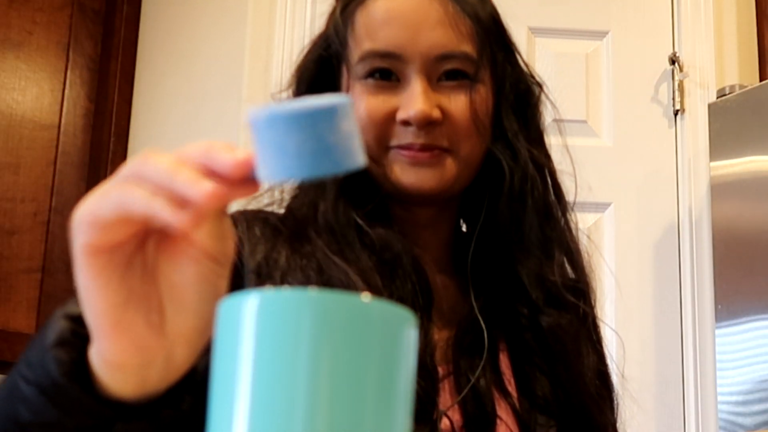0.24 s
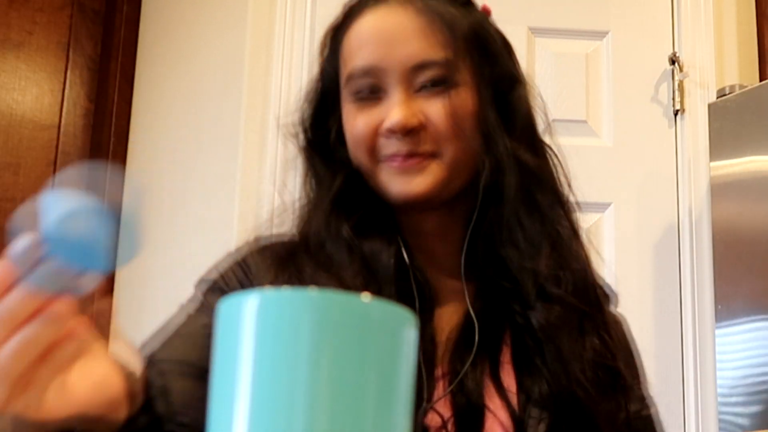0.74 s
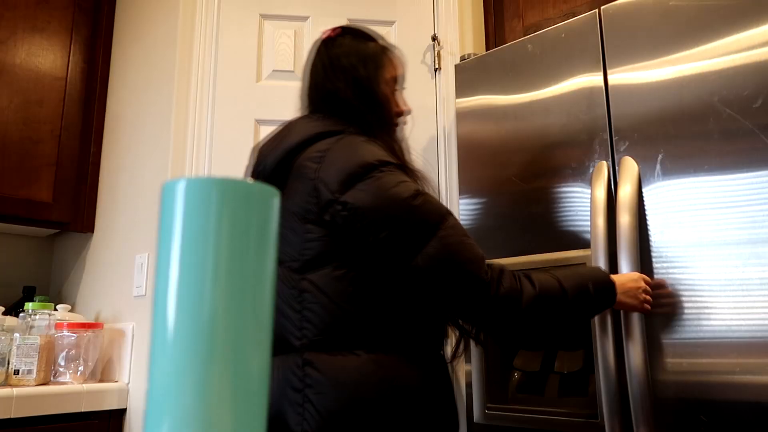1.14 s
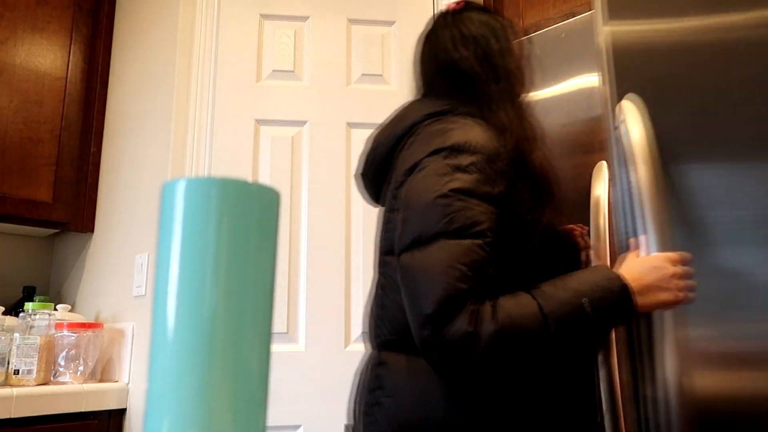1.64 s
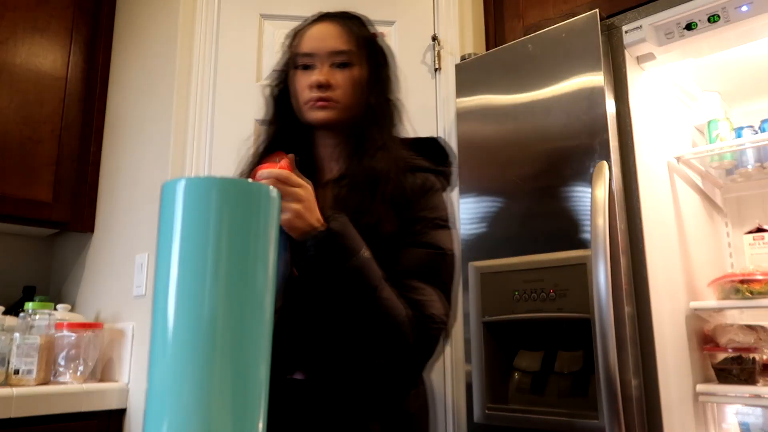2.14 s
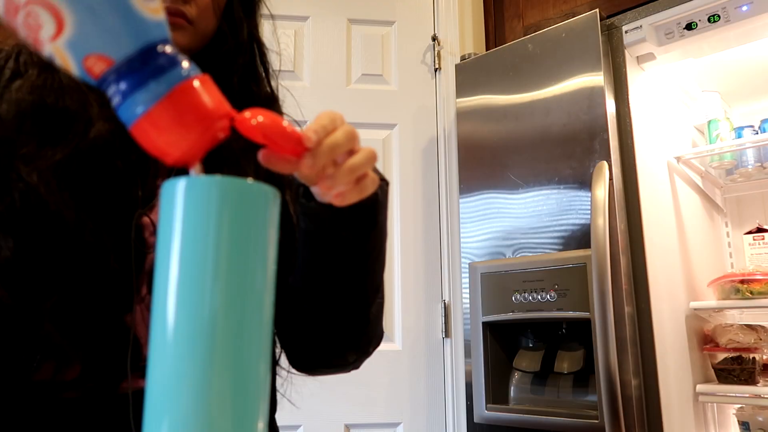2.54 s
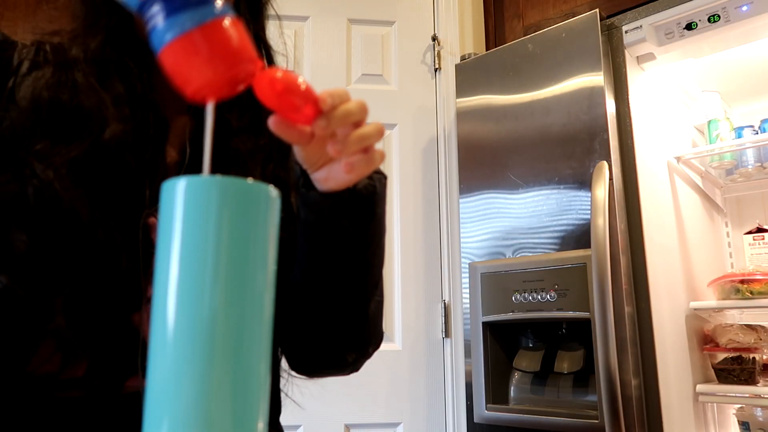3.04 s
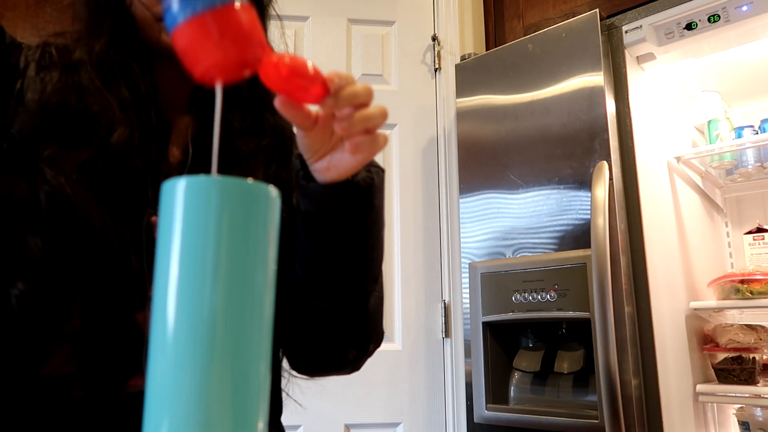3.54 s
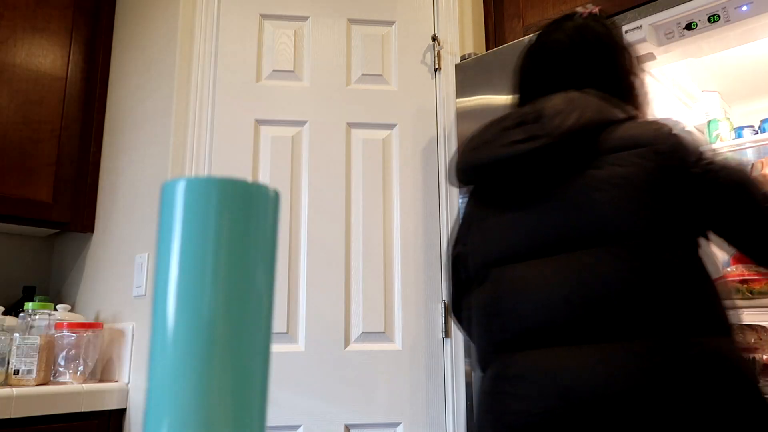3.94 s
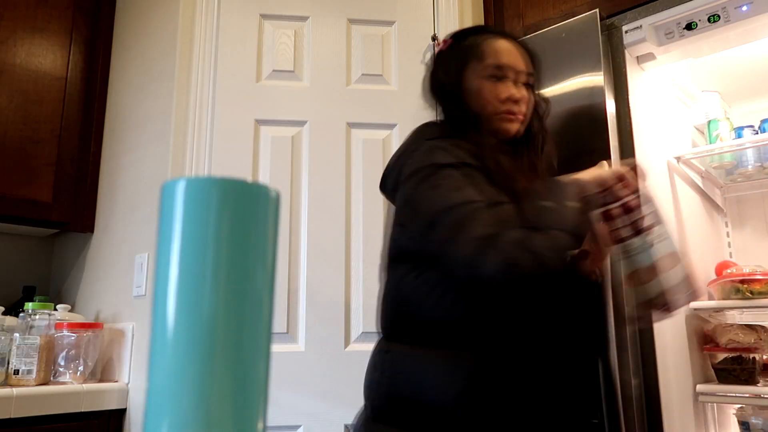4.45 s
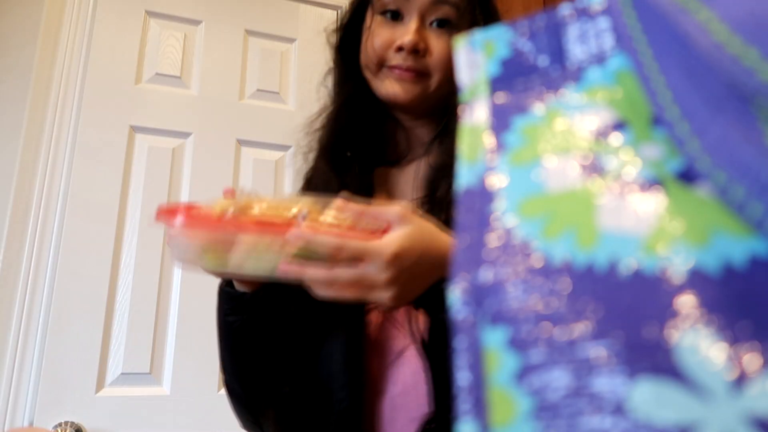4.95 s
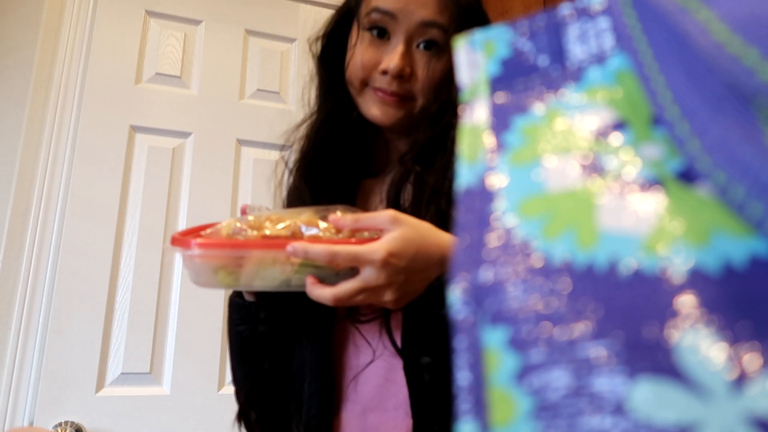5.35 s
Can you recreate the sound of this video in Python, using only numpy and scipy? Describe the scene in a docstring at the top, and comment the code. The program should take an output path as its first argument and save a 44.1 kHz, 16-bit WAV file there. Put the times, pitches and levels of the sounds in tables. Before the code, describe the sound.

Over a low fridge hum and the soft rustle of a padded jacket, a rubber door seal unsticks and the door shudders open with deep thumps. A sharp pop and click follow from a nearby plastic bottle cap. Then comes about a second of rummaging: containers slide and bump, a jar clinks, and a full carton is jolted. The kitchen adds a short echo, and only hum and faint rustling remain at the end.

```python
"""A quiet kitchen, where a refrigerator hums. Its door peels off the rubber seal by stick-slip friction
and thumps in its panel modes. Close by, a bottle's flip cap pops and sets the air in the neck ringing.
Containers knock and slide on the resonant shelves, a jar clinks, and liquid jolts a crackling carton.
A padded jacket rustles, the room reverberates, and five times the level dips briefly."""
import sys
import numpy as np
from scipy import signal
from scipy.fft import rfft, irfft, next_fast_len
from scipy.io import wavfile
from scipy.ndimage import map_coordinates

SR = 44100
rng = np.random.default_rng(int(sys.argv[2]) if len(sys.argv) > 2 else 0)


def waveform_to_disk(signal):
    """Save audio, clipped to [-1, 1], as 16-bit WAV at the path in sys.argv[1]."""
    frames = np.transpose(np.atleast_2d(signal))
    scaled = np.clip(frames, -1, 1) * 32767
    samples = np.round(scaled).astype(np.int16)
    wavfile.write(sys.argv[1], SR, samples)


N = 246468
TIME = np.arange(N) / SR
AGE = TIME[:SR // 2]  # time since an impact, s


def amp(db):
    """Amplitude ratio of a level in decibels."""
    return np.exp(np.maximum(db, -300) * (np.log(10) / 20))


def unit(x):
    """Normalisation to rms 1."""
    return x / np.sqrt(np.mean(x ** 2) + 1e-20)


def along(points, hz):
    """Interpolation of (f, value) points on a logarithmic frequency axis."""
    f, v = np.transpose(points)
    return np.interp(np.log(hz + 1), np.log(f + 1), v)


def filtered(x, response):
    """Linear filtering: the spectrum of x times a frequency response."""
    n = x.shape[-1]
    m = next_fast_len(n + 8192)
    return irfft(rfft(x, m) * response(np.fft.rfftfreq(m, 1 / SR)), m)[..., :n]


def coloured(x, spectrum):
    """Spectral shaping by (f/Hz, level/dB) points, at rms 1."""
    return unit(filtered(x, lambda hz: amp(along(spectrum, hz))))


def wobble(rate):
    """Random modulation: a smooth curve with rate knots a second."""
    coarse = TIME[::32]
    knots = rng.standard_normal(int(N * rate / SR) + 4)
    return np.interp(TIME, coarse, map_coordinates(knots, [coarse * rate]))


def stroke(s, length, attack, t60):
    """Envelope with a linear attack from time s, a hold and an exponential decay."""
    return np.clip((TIME - s) / attack, 0, 1) * amp(-60 * np.maximum(TIME - s - length, 0) / t60)


def swell(s, half_length):
    """Gaussian envelope centred on time s."""
    return np.exp(-((TIME - s) / half_length) ** 2)


def add(track, s, sound):
    """Superposition of a sound on a track at time s."""
    part = track[round(s * SR):][:len(sound)]
    part += sound[:len(part)]


def ring(modes, contact=0.000067):
    """Free vibration of damped modes (f/Hz, level/dB, T60/s) after a blow of about contact s; peak 1."""
    hz, db, t60 = np.transpose(modes)[:, :, None]
    level = db + rng.standard_normal(hz.shape) - 60 * AGE / t60
    sign = (-1) ** np.arange(len(hz))[:, None]  # neighbouring modes move in opposite directions
    x = np.sum(sign * amp(level) * np.sin(2 * np.pi * hz * AGE), axis=0) * (1 - np.exp(-AGE / contact))
    # nothing radiates far below the lowest mode
    x = signal.sosfilt(signal.butter(2, hz.min() / 2, "high", fs=SR, output="sos"), x)
    return x / np.abs(x).max()


def crack(spectrum, t60, rise=.0001):
    """Modal overlap: the dense modes of a contact merge into decaying noise."""
    noise = coloured(rng.standard_normal(len(AGE)), spectrum)
    return .5 * noise * amp(-60 * AGE / t60) * (1 - np.exp(-AGE / rise))


def slips(rate, spread_db):
    """Stick-slip friction as a Poisson train of uneven impulses, rate a second."""
    return (rng.random(N) < rate / SR) * rng.standard_normal(N) * amp(spread_db * rng.standard_normal(N))


def body(x, modes):
    """Forced vibration: x convolved with the impulse response of the modes, at rms 1."""
    return unit(signal.fftconvolve(x, ring(modes))[:N])


def diffuse(pair, width):
    """Spatial coherence: a diffuse field at two close points is alike in the bass, apart in the treble."""
    side = filtered(pair[1], lambda hz: amp(along(width, hz)))
    return np.array([pair[0] + side, pair[0] - side])


# reverberation time of the room: f/Hz, T60/s
ROOM_T60 = [(100, 0.47), (400, 0.51), (2500, 0.51), (6000, 0.62), (14000, 0.31)]
# stereo width of the reverberation: f/Hz, side over mid/dB
ROOM_WIDTH = [(100, -86), (250, -27.5), (500, -17.5), (1000, -14), (2000, -15), (4000, -3), (8000, 4),
              (13000, 12)]
ECHO_CHANGE_S = .13


def kitchen(x, wet_db, bass_db, early, lag):
    """Reverberation: direct sound, lag samples later on the left, plus a changing diffuse field."""
    wet, hop = np.zeros((2, N)), round(ECHO_CHANGE_S * SR)
    fade = signal.get_window("cosine", 2 * hop)
    # near surfaces answer first and strongest
    build = (1 - np.exp(-(AGE / 0.00044) ** 2)) * (1 + early * np.exp(-AGE / 0.03))
    for start in range(0, N - 2 * hop, hop):
        piece = x[start:start + 2 * hop] * fade
        if np.abs(piece).max() > 1e-3:  # a new response each time, as door and body move
            hz, t, noise = signal.stft(rng.standard_normal((2, len(AGE))), SR, nperseg=256)
            decay = amp(-60 * t / along(ROOM_T60, hz)[:, None])
            tail = signal.istft(noise * decay, SR, nperseg=256)[1][:, :len(AGE)] * build
            for side, answer in zip(wet, tail / np.linalg.norm(tail[0])):
                add(side, start / SR, signal.fftconvolve(piece, answer))
    wet = diffuse(filtered(wet, lambda f: amp(along([(170, bass_db), (500, 0)], f))), ROOM_WIDTH)
    direct = filtered(x, lambda f: np.exp(1j * np.pi * f * lag / SR * np.array([[-1], [1]]))) if lag else x
    return direct + amp(wet_db) * wet


# spectrum of the moving air: f/Hz, level/dB
AIR_SPECTRUM = [(15, -53), (25, -9), (39, -21), (55, -10.5), (136, -7), (160, -13), (183, -9.5),
                (281, -7.5), (313, -6.5), (582, -19), (1050, -20.5), (1660, -25.5), (3530, -29),
                (13200, -50), (15500, -53)]
# stereo width of air and jacket noise: f/Hz, side over mid/dB
NOISE_WIDTH = [(60, -41), (110, -19), (200, -13), (380, -8.5), (700, -6), (1290, -5), (2380, -6),
               (4400, -2.5), (8120, 1), (15000, 4)]
MAINS_HZ, OPEN_S, DOOR_SWING_S = 60, 0.99, 0.38
MAINS_DB, FAN_DB, AIR_DB = -58.5, -61, -47  # door shut
OPEN_MAINS_DB, OPEN_FAN_DB, OPEN_AIR_DB = 9, 2.5, 1.33  # added by the open door until the last dip
NEAR_FAN_DB, NEAR_AIR_DB = 13.5, 3.5  # added after it, when the fan sounds closer
FAN_FLUTTER_DB = 3


def hum():
    """Line spectrum over broadband noise: compressor hum, fan tone, electrical whine and moving air."""
    def tone(hz, drift):
        phase = 2 * np.pi * hz * TIME + drift * wobble(rate=10)
        return np.sqrt(2) * np.sin(phase) * amp(1.8 * wobble(rate=8.9))

    near = TIME > DIP_TIMES[-1]
    opened = np.clip((TIME - OPEN_S) / DOOR_SWING_S, 0, 1) * ~near
    mains = amp(MAINS_DB + OPEN_MAINS_DB * opened)
    fan = amp(FAN_DB + OPEN_FAN_DB * opened + NEAR_FAN_DB * near)
    fan *= unit(amp(FAN_FLUTTER_DB * wobble(rate=18)))
    air = amp(AIR_DB + OPEN_AIR_DB * opened + NEAR_AIR_DB * near)
    lines = mains * tone(hz=MAINS_HZ, drift=0.5) + fan * tone(hz=200.5, drift=0.95)
    lines += amp(-57) * tone(hz=319.6, drift=1.4) + amp(-82) * tone(hz=13006, drift=0.82)
    return lines + air * diffuse(coloured(rng.standard_normal((2, N)), AIR_SPECTRUM), NOISE_WIDTH)


# arm swings in the jacket: t/s of the fastest moment, half length/s, level/dB
ARM_SWINGS = [(1.15, 0.13, -46), (2.16, 0.25, -44), (2.884, 0.45, -51.5), (4.327, 0.084, -44.5),
              (5.178, 0.25, -45)]
# spectrum of rustling nylon: f/Hz, level/dB
NYLON_SPECTRUM = [(350, -15), (600, -8), (809, -3), (1300, -5.5), (2160, -2), (3070, -4.5), (12300, -25),
                  (15500, -21)]
# rubs on plastic, nylon and rubber: t/s, half length/s, f/Hz, bandwidth/Hz, level/dB
SQUEAKS = [(0.296, 0.05, 2580, 600, -50.5), (0.41, 0.055, 2510, 350, -57.5),
           (1.556, 0.019, 4940, 2500, -51.5), (4.599, .2, 11200, 3500, -63.5),
           (5.215, 0.024, 488, 110, -37.5)]
FIDGET_DB, FIDGET_S = -52.5, 1.5  # the jacket stirs until the door is reached


def handling():
    """Friction noise: sleeves rustle over a broad band, rubbed surfaces squeak in narrow ones."""
    motion = amp(FIDGET_DB) * stroke(0, FIDGET_S, attack=.005, t60=.5)
    motion += sum(amp(db) * swell(s, half_length) for s, half_length, db in ARM_SWINGS)
    sleeves = motion * amp(-5 + 1.8 * wobble(rate=34))
    rubs = np.zeros(N)
    for s, half_length, hz, width_hz, db in SQUEAKS:
        squeak = unit(filtered(rng.standard_normal(N), lambda f: 1 / (1 + (2 * (f - hz) / width_hz) ** 2)))
        rubs += amp(db) * squeak * swell(s, half_length)
    rustle = sleeves * diffuse(coloured(rng.standard_normal((2, N)), NYLON_SPECTRUM), NOISE_WIDTH)
    return rustle + kitchen(rubs, wet_db=-3, bass_db=-4, early=0.93, lag=0)


# the carton's wall dents under the fingers: t/s, f/Hz, level/dB
DENTS = [(4.471, 3180, -18.5), (4.503, 2700, -25), (4.56, 3680, -24), (4.567, 2400, -27),
         (4.619, 4270, -28.5), (4.674, 1700, -22.5), (4.687, 2800, -29), (4.725, 990, -26.5)]


def crackles():
    """Buckling: the gripped carton snaps, coloured each time by the patch of wall that gives way."""
    x = np.zeros(N)
    for s, hz, db in DENTS:
        patch = [(hz / 4, -15), (hz / 1.8, -7), (hz, 0), (hz * 1.53, -14), (hz * 2, -26), (16000, -38)]
        add(x, s, amp(db) * crack(patch, t60=0.031, rise=0.0008))
    return x


# liquid hits the carton's wall: t/s, thud level/dB, slap level/dB
LIQUID_HITS = [(4.7563, -4, -14), (4.7593, -14, -22), (4.786, -14, -37), (4.798, -17.5, -30)]
# modes of the full carton: f/Hz, level/dB, T60/s
CARTON_MODES = [(122, -2.5, 0.18), (145.6, 1.5, 0.15), (186.5, 4.5, 0.11), (267, -4, 0.14),
                (310.6, -3, 0.19), (440, 5.5, 0.042), (876, -16, 0.057), (1210, -20, 0.06)]
# spectrum of the slapped wall: f/Hz, level/dB
SLAP_SPECTRUM = [(400, -20), (800, 7.5), (1400, -6), (2000, -10), (2700, 3), (3400, -2.5), (4500, -21),
                 (8000, -36), (14000, -32)]


def carton():
    """Impact excitation: liquid thuds and slaps against the soft, crackling walls of a jolted carton."""
    x = crackles()
    for s, thud_db, slap_db in LIQUID_HITS:
        thud = amp(thud_db) * ring(CARTON_MODES, contact=0.00046)
        add(x, s, thud + amp(slap_db) * crack(SLAP_SPECTRUM, t60=0.067, rise=0.00046))
    return kitchen(x, wet_db=-8.5, bass_db=-13.5, early=0.69, lag=1.0)


# an edge grates over the shelf: t/s, length/s, resonance f/Hz, level/dB
GRATE_RUNS = [(3.87, 0.019, 510, -33.5), (4.106, 0.034, 1390, -42.5), (4.248, 0.016, 1930, -41.5),
              (4.283, 0.016, 950, -35.5), (4.463, .008, 2840, -37), (4.467, 0.044, 925, -32.5),
              (4.556, 0.0059, 1640, -31.5), (4.619, 0.018, 4300, -49), (4.635, 0.023, 1610, -36),
              (4.684, 0.0063, 2660, -37)]
# spectrum of the grating edge: f/Hz, level/dB
GRATE_SPECTRUM = [(300, -8), (600, 3.5), (1000, -3.5), (1900, -1.5), (3300, -6), (5000, -22.5), (8000, -26),
                  (13000, -38.5)]
GRATE_RING_DB, GRATE_WIDTH = 14.5, 0.13  # the resonance's lift and fractional bandwidth
GRATE_ATTACK_S, GRATE_T60_S = 0.0045, 0.057


def grates():
    """Resonance: short runs of dense slips each make one mode of a container sing."""
    x, grains = np.zeros(N), slips(rate=3500, spread_db=2)
    for s, length, hz, db in GRATE_RUNS:
        resonance = lambda f: 1 + amp(GRATE_RING_DB) / (1 + (2 * (f / hz - 1) / GRATE_WIDTH) ** 2)
        colour = lambda f: amp(along(GRATE_SPECTRUM, f)) * resonance(f)
        run = unit(filtered(grains[round(s * SR):][:len(AGE)], colour))
        release = amp(-60 * np.maximum(AGE - length, 0) / GRATE_T60_S)
        add(x, s, amp(db) * run * np.minimum(AGE / GRATE_ATTACK_S, 1) * release)
    return x


# modes of a plastic shelf: f/Hz, level/dB, T60/s
SHELF_MODES = [(160, -11.5, 0.11), (203, -5, 0.056), (247, 0.5, 0.055), (322, -1, 0.068),
               (390.6, -4.5, 0.084), (512, -3, 0.035), (878, -14.5, 0.068), (1428, -18, 0.091)]
SHELF_SHIFT = 0.11  # fractional shift of the modes, down and up


def drone():
    """Mass loading: under a sliding weight the shelf's hum wanders between lower and higher modes."""
    turn = np.pi / 4 * (1 + np.tanh(2 * wobble(rate=20)))
    tunings = [[(hz * (1 + shift), db, t60) for hz, db, t60 in SHELF_MODES]
               for shift in (-SHELF_SHIFT, SHELF_SHIFT)]
    low, high = [body(slips(rate=620, spread_db=3), modes) for modes in tunings]
    return np.cos(turn) * low + np.sin(turn) * high


# a container is pushed, the hand searches, the carton is dragged: t/s, length/s, attack/s, level/dB
DRAG_STROKES = [(3.803, .13, 0.063, -36.5), (4.01, 0.3, 0.017, -43), (4.391, 0.53, 0.014, -34.5)]
# spectra of scraping and of struck hard plastic: f/Hz, level/dB
SCRAPE_SPECTRUM = [(410, -16), (700, 0), (1100, 1), (1700, -7), (2800, -6), (3500, -14.5), (6000, -19.5),
                   (9000, -37), (12500, -49), (15000, -46)]
CLACK_SPECTRUM = [(240, -26), (400, -2), (540, -2.5), (650, -13), (1100, -11.5), (1400, -5.5), (1900, -11),
                  (3300, -15.5), (6000, -25.5), (8000, -33.5), (10500, -42.5), (13000, -36), (14500, -52)]
BUMPS_PER_S = 15


def sliding():
    """Sliding friction: dragged containers scrape, drive shelf and cabinet, and catch unevenly."""
    drag = sum(amp(db) * stroke(s, length, attack, t60=0.36) for s, length, attack, db in DRAG_STROKES)
    x = amp(1.5) * drag * drone()
    scrape = coloured(slips(rate=2200, spread_db=2.5), SCRAPE_SPECTRUM) * amp(1.8 * wobble(rate=45))
    x += amp(-6.5) * drag * scrape
    cabinet = [(50, -18), (90, 0.5), (135, 2.5), (200, 3), (320, -41.5)]
    x += amp(-5.5) * drag * coloured(slips(rate=450, spread_db=-2), cabinet)
    travel = np.floor(BUMPS_PER_S * TIME + 0.67 * wobble(rate=19))
    catches = drag * (np.diff(travel, prepend=0) > 0)  # a harder drag bumps harder
    bump = amp(3.5) * ring(SHELF_MODES, contact=0.001)
    bump += amp(-11) * crack(CLACK_SPECTRUM, t60=0.04, rise=0.00051)
    return x + signal.fftconvolve(catches, bump)[:N]


# containers bump the shelves: t/s, knock level/dB, cavity f/Hz, clack level/dB
SHELF_KNOCKS = [(3.879, -18.5, 392, -28), (3.9499, -16, 319, -11.5), (3.954, -9.5, 440, -6),
                (3.958, -17, 505, -11), (3.995, -26.5, 92, -22), (4.2822, -22.5, 650, -27.5),
                (4.373, -18, 198, -26), (4.388, -11.5, 278, -13.5), (4.393, -14.5, 162, -30),
                (4.403, -14, 286, -25), (4.469, -10, 341, -20.5), (4.498, -21, 500, -32),
                (4.56, -19.5, 342, -27), (4.684, -17, 377, -33), (4.831, -20, 780, -32),
                (5.354, -33.5, 644, -33)]
# blows on the jar: t/s, level/dB
JAR_HITS = [(3.9497, -22), (4.373, -26), (4.388, -7.5), (4.403, -23), (4.435, -22), (4.56, -34)]
# modes of the jar: f/Hz, level/dB, T60/s
JAR_MODES = [(1420, -11, 0.01), (1926, 8, 0.014), (2080, 1, 0.016), (2260, -2.5, 0.015),
             (2750, -5.5, 0.016), (3420, -11, 0.019)]


def shelves():
    """Modal response to impact: amid the sliding, knocks ring the shelf, hollow containers and a jar."""
    x = grates() + sliding()
    for s, knock_db, hollow_hz, clack_db in SHELF_KNOCKS:
        hollow = ring([(hollow_hz, 0, .05), (1.182 * hollow_hz, -3, .04)], contact=0.00053)
        knock = .5 * ring(SHELF_MODES, contact=0.0013) + .5 * hollow
        add(x, s, amp(knock_db) * knock + amp(clack_db) * crack(CLACK_SPECTRUM, t60=0.052, rise=0.00054))
    clinks = np.zeros(N)
    for s, db in JAR_HITS:
        add(clinks, s, amp(db) * ring(JAR_MODES, contact=0.0013))
    return (kitchen(x, wet_db=-2.5, bass_db=-0.5, early=1.0, lag=1.1)
            + kitchen(clinks, wet_db=-6, bass_db=2, early=0.63, lag=1.6))


# the cap pops and snaps: t/s, pop level/dB, snap level/dB, tick level/dB
CAP_POPS = [(2.2542, -0.5, -12, -27), (2.2624, -17.5, -15, -28), (2.2918, -13, -6, -31),
            (2.299, -31, -20, -13.5)]
# the lid swings back on its hinge: t/s, level/dB
HINGE_CLICKS = [(2.3816, -15.5), (2.3835, -9)]
# modes of the bottle's neck air and wall, the lid swung back, the lid at its catch: f/Hz, level/dB, T60/s
BOTTLE_MODES = [(252.7, -20, 0.19), (513, 4, 0.018), (736, 4.5, 0.0097), (1010, -2.5, 0.012),
                (2120, -6.5, 0.01), (3300, -11, 0.0077), (3855, -15, 0.023)]
LID_MODES = [(277, -7, 0.098), (570, -7, 0.015), (2610, -26, 0.15), (2630, -21, 0.17), (2650, 4.5, 0.017),
             (2790, -9, 0.016), (3270, -0.5, 0.016), (3340, -22.5, 0.13), (5163, -26.5, 0.12)]
CATCH_MODES = [(270, -4, 0.13), (2630, -2, 0.11), (3190, -5, .13), (4770, -4.5, .16), (4920, 2, .06),
               (5120, -10, 0.14)]
# spectra of the bottle's thin wall, the snapping lid and the catch's sharp edge: f/Hz, level/dB
BUZZ_SPECTRUM = [(200, -25), (450, -8), (1050, 2), (1350, -8.5), (2150, 1), (3200, -13), (5000, -13.5),
                 (8000, -27.5)]
SNAP_SPECTRUM = [(400, -20), (1300, -2), (2600, 4), (4000, -1), (5000, 1), (6000, -11), (9500, -22),
                 (12500, -14), (16000, -30)]
TICK_SPECTRUM = [(3000, -25), (6300, 0), (7800, -3), (9500, -4), (12500, -4), (16000, -4.5)]
CATCH_S = 2.2925


def cap():
    """Cavity resonance: the flip cap frees the air in the neck, snaps past its catch and clicks back."""
    x, lid = np.zeros(N), np.zeros(N)
    # a thumb first taps the closed bottle
    tap = amp(-23) * ring([(470, -6, 0.022), (3000, -6.5, 0.0067)], contact=0.0017)
    add(x, 2.052, tap + amp(-30) * crack(SNAP_SPECTRUM, t60=0.041, rise=0.00082))
    for s, pop_db, snap_db, tick_db in CAP_POPS:
        pop = ring(BOTTLE_MODES, contact=0.00016) + amp(-15.5) * crack(BUZZ_SPECTRUM, t60=0.31, rise=0.0045)
        snap = crack(SNAP_SPECTRUM, t60=0.0083)
        tick = crack(TICK_SPECTRUM, t60=0.0084)
        add(x, s, amp(pop_db) * pop + amp(snap_db) * snap + amp(tick_db) * tick)
    for s, db in HINGE_CLICKS:
        click = ring(LID_MODES, contact=0.00063) + amp(-18) * crack(SNAP_SPECTRUM, t60=0.012)
        click += amp(-20) * crack(TICK_SPECTRUM, t60=0.012)
        add(lid, s, amp(db) * click)
    # the thin lid rings and buzzes on after the catch
    add(lid, CATCH_S, amp(-13.5) * ring(CATCH_MODES, contact=0.0002))
    add(x, CATCH_S, amp(-27.5) * crack(SNAP_SPECTRUM, t60=0.54))
    return (kitchen(x, wet_db=-8.5, bass_db=19.5, early=0.82, lag=-0.49)
            + kitchen(lid, wet_db=-11.5, bass_db=18.5, early=1.0, lag=-0.5))


# the stretched seal groans and chirps: t/s, half length/s, f/Hz, glide/(Hz/s), level/dB
RUBBER_GROANS = [(1.277, 0.024, 289.6, -700, -24), (1.223, .004, 947, 0, -29), (1.281, .005, 1237, 0, -18),
                 (1.506, .018, 259.2, 0, -17), (1.52, 0.013, 391, 0, -27.5), (1.55, .02, 207, -500, -21),
                 (1.588, .022, 259, 1301, -25.5)]
GROAN_WAVER, GROAN_OCTAVE_DB = 0.063, -24  # fractional pitch deviation; second harmonic


def groans():
    """Stick-slip oscillation: rubber slips at a gliding, wavering rate, a rough tone with its octave."""
    waver, grip = 1 + GROAN_WAVER * wobble(rate=79), amp(1.3 * wobble(rate=140))
    x = np.zeros(N)
    for s, half_length, hz, glide, db in RUBBER_GROANS:
        near = np.abs(TIME - s) < 4 * half_length
        phase = 2 * np.pi * np.cumsum((hz + glide * (TIME[near] - s)) * waver[near]) / SR
        tone = np.sin(phase) + amp(GROAN_OCTAVE_DB) * np.sin(2 * phase)
        x[near] += amp(db) * (swell(s, half_length) * grip)[near] * tone
    return x


# the seal peels off in strips, the long side hardest: t/s, length/s, attack/s, level/dB
SEAL_STRIPS = [(1.208, 0.046, 0.0082, -26), (1.256, 0.083, 0.035, -24.5), (1.434, 0.014, 0.0045, -30.5)]
# spectrum of peeling rubber: f/Hz, level/dB
PEEL_SPECTRUM = [(350, -5), (600, -2), (950, 3.5), (1100, -2), (1500, -0.5), (2500, -7.5), (3800, -16.5),
                 (6000, -27.5), (10000, -40), (15000, -63)]


def seal():
    """Adhesive failure: the rubber unsticks in tiny slips; peeling and door thumps shake the cabinet."""
    peel = sum(amp(db) * stroke(s, length, attack, t60=0.44) for s, length, attack, db in SEAL_STRIPS)
    jolts = [amp(db) * stroke(s, length=0, attack=0.0036, t60=0.26) for s, db, _, _ in DOOR_THUMPS]
    shake = peel + amp(-14.5) * np.linalg.norm(jolts, axis=0)
    crackle = coloured(slips(rate=2900, spread_db=4), PEEL_SPECTRUM) * amp(2.3 * wobble(rate=130))
    x = amp(-2.5) * peel * crackle
    cabinet = [(20, -31), (45, -7), (80, 6), (110, -1.5), (220, 6.5), (300, 5.5), (520, 3),
               (800, -16), (1500, -70)]
    x += amp(-4) * shake * coloured(slips(rate=900, spread_db=1), cabinet) + groans()
    # the long side rips away in coarse slips just before the panel comes free
    rip = [(500, -17), (1250, -2), (1900, -6.5), (2500, 6), (3600, -13), (6000, -21), (14000, -33)]
    x += amp(-29.5) * swell(1.276, 0.018) * coloured(slips(rate=700, spread_db=0), rip)
    # the pull flexes the whole door against the suction
    flex_modes = [(46, -2, 0.1), (68, -2, .1), (92, 0, .09)]
    x += amp(-29) * swell(1.336, 0.049) * body(slips(rate=560, spread_db=1), flex_modes)
    # the last corner tears free
    tear = [(600, -13), (1400, 8), (2000, -1.5), (3300, -6), (4500, -26), (14000, -46)]
    x += amp(-27.5) * stroke(1.446, 0.018, 0.0028, 0.06) * coloured(slips(rate=1100, spread_db=-2.5), tear)
    # air hisses and spits in through the first narrow gap
    hiss = [(1500, -6), (4000, 1), (8000, -9.5), (14000, -21)]
    return x + amp(-41) * swell(1.28, 0.061) * coloured(slips(rate=1800, spread_db=3), hiss)


# the door shudders as the seal lets go: t/s, thump level/dB, hardness/dB, rattle level/dB
DOOR_THUMPS = [(1.298, -3.5, -4, -18), (1.327, 0.5, 8.5, -13.5), (1.348, -11, 7, -13.5),
               (1.372, -7.5, 17, -18), (1.426, -3.5, 3.5, -24), (1.446, -5.5, 3, -12.5),
               (1.4615, -1, 1, -17.5), (1.484, -10, 4, -32), (1.5, -18, 11, -32), (1.552, -21, 13, -34),
               (1.766, -32, -11, -41), (1.992, -30.5, 4, -57)]
# modes of the door panel: f/Hz, level/dB, T60/s
PANEL_MODES = [(48, -19.5, 0.067), (76, -17, 0.048), (126.6, -4.5, 0.09), (129, -7, 0.12), (153.2, 6, 0.1),
               (198, -2, 0.061), (233, -2.5, 0.1), (262, -12.5, 0.081), (305, -22, 0.071),
               (394, -27.5, 0.09), (458, -18, 0.032)]
HARD_ABOVE_HZ = 150  # hardness lifts the modes over the octave above this, and all higher ones alike


def door():
    """Plate vibration: freed from its seal, the panel booms in its modes and its bins rattle."""
    x = seal()
    bins = [(250, -10), (500, -1), (750, -2), (1100, -3), (2000, -13.5), (3200, -22),
            (5000, -49), (12000, -57)]
    for s, thump_db, hardness, rattle_db in DOOR_THUMPS:
        panel = [(hz, db + hardness * np.clip(np.log2(hz / HARD_ABOVE_HZ), 0, 1), t60)
                 for hz, db, t60 in PANEL_MODES]
        rattle = crack(bins, t60=0.1, rise=0.002)
        add(x, s, amp(thump_db) * ring(panel, contact=0.0025) + amp(rattle_db) * rattle)
    tick = [(2000, 0), (5500, -1), (9000, -13), (12000, -11), (15000, -28)]  # a light switch clicks
    add(x, 1.743, amp(-30.5) * crack(tick, t60=0.014))
    return kitchen(x, wet_db=-2.5, bass_db=-4, early=1.0, lag=0)


# brief dips in the overall level: t/s
DIP_TIMES = [1.205, 1.973, 2.607, 3.809, 4.844]
DIP_RAMP_S = 0.0043


def scene():
    """Superposition of all sources; at the last dip the clatter and its echo break off for 0.4 s."""
    break_off = 1 - np.interp(TIME - DIP_TIMES[-1], [-.005, 0, .4, .45], [0, 1, 1, 0])
    mix = door() + cap() + break_off * (shelves() + carton()) + handling() + hum()
    to_nearest_dip = np.abs(TIME - np.array(DIP_TIMES)[:, None]).min(axis=0)
    return mix * np.clip(to_nearest_dip / DIP_RAMP_S, 0, 1)


# treble response of the microphone: f/Hz, level/dB
MIC_RESPONSE = [(12500, 0), (14500, -11), (15800, -11)]
TOP_HZ = 15780


def record(dry):
    """Saturation and band limiting: peaks round off at full scale and the top octave droops."""
    held = dry / (1 + dry ** 8) ** (1 / 8)
    return filtered(held, lambda hz: amp(along(MIC_RESPONSE, hz)) * (hz < TOP_HZ))


dry = scene()
out = record(dry)
waveform_to_disk(out)
```